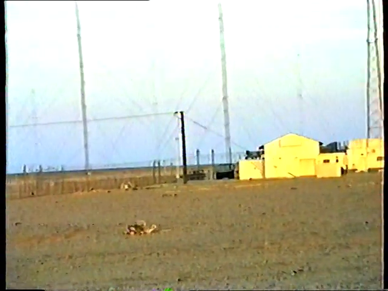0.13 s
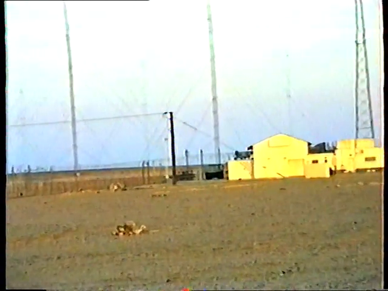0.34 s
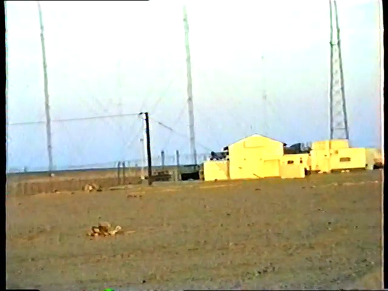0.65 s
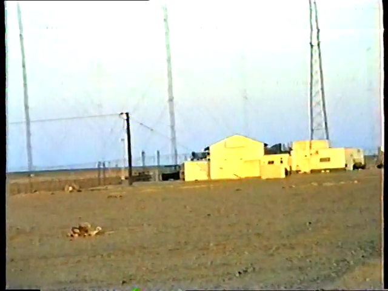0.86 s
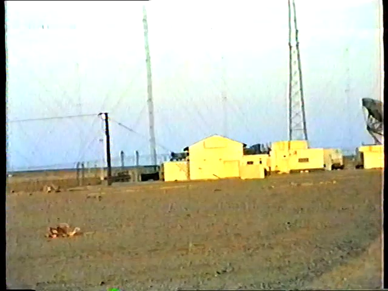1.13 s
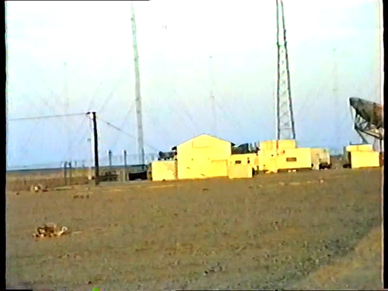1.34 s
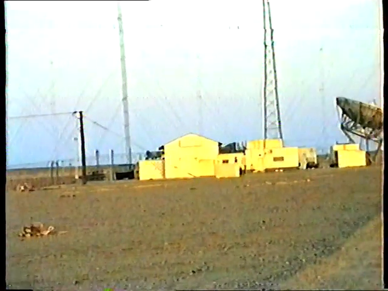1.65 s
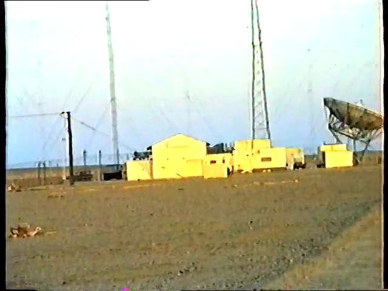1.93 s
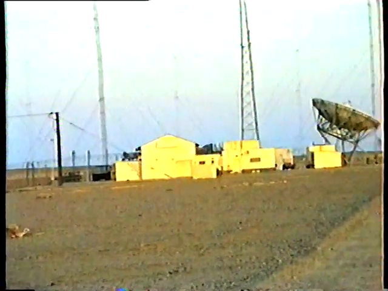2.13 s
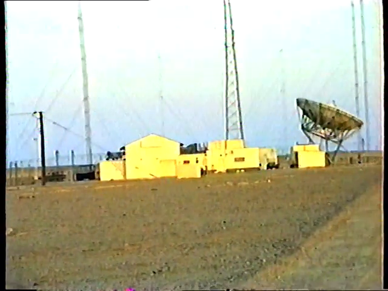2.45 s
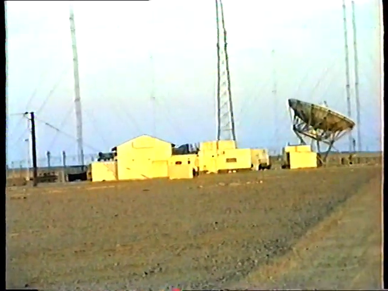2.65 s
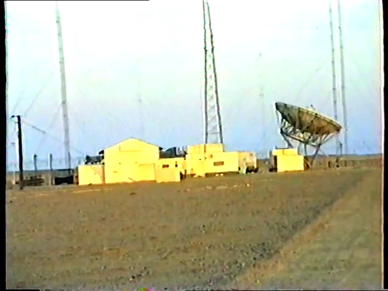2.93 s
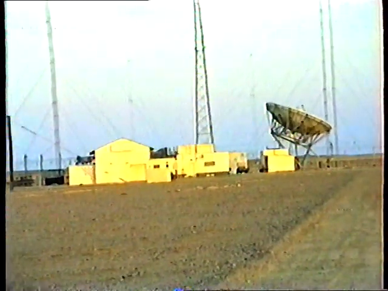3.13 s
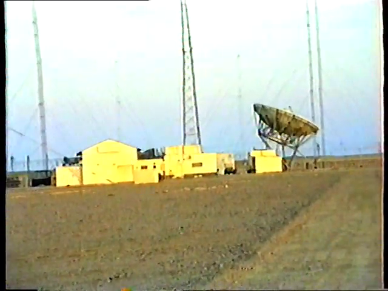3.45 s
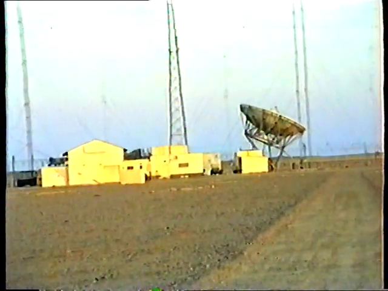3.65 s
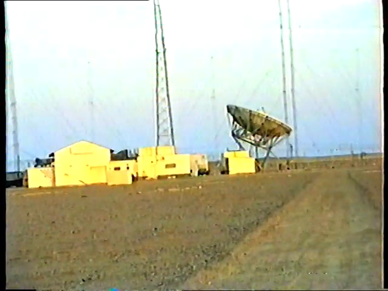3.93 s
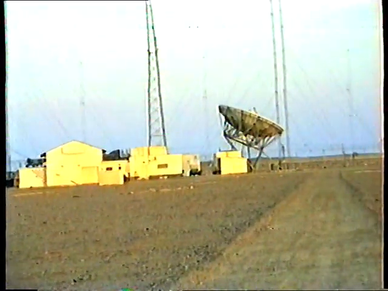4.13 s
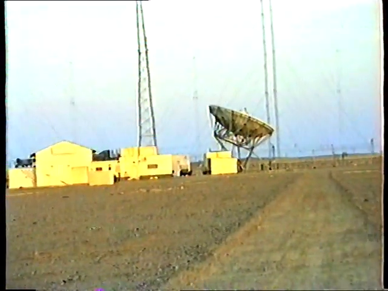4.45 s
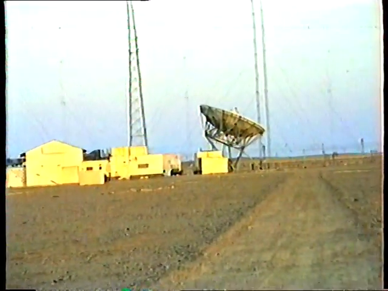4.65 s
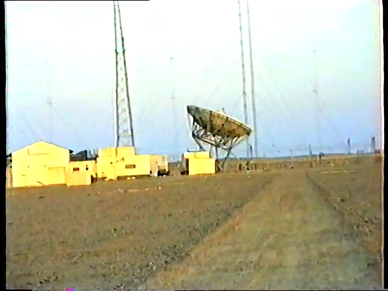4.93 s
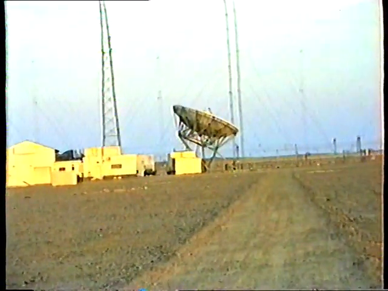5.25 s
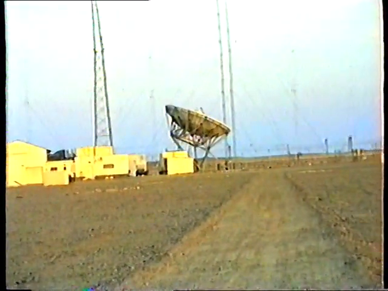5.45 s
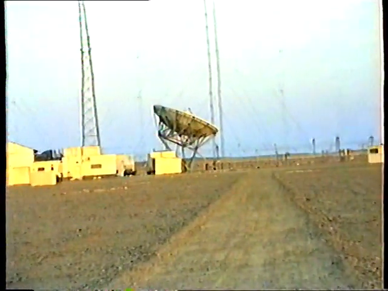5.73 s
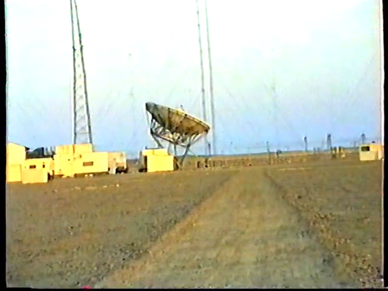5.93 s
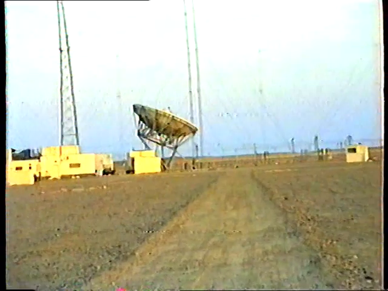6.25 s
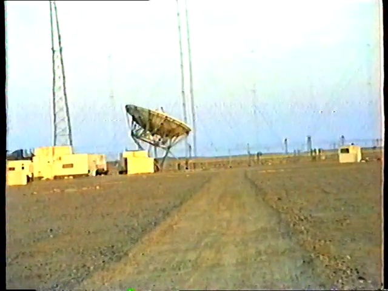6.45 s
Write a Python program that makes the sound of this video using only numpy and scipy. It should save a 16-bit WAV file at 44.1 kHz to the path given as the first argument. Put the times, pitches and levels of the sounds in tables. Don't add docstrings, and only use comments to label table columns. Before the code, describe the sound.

Throughout about 6.6 seconds, gusty desert wind presses on a tape camcorder's two microphones, making a dry, low, uneven rumble mostly below a few hundred hertz. Left and right flutter independently, giving a wide, unstable image. From 0 to 1.5 s it thumps in irregular puffs; around 1.8 to 3 s it is fuller and rougher, with a push near 3.0. It eases from about 3.3 to 4 s, then heavy blows arrive near 4.2, 4.5 and 4.9. After a short dip it surges again from 5.6 to the abrupt end, leaning right. Quietly underneath are a constant motor whirr, a fast 150-per-second drum buzz and soft tape hiss. Sparse dull ticks occur, including a small group near 1.9 to 2.1 s. At 3.6 s several light knocks touch the housing; a soft rub and tiny electrical zip follow at 3.8 s.

```python
import sys
import numpy as np
from scipy import signal
from scipy.fft import rfft, irfft, next_fast_len
from scipy.io import wavfile
from scipy.ndimage import uniform_filter1d

SR = 44100
rng = np.random.default_rng(int(sys.argv[2]) if len(sys.argv) > 2 else 0)


def invert_db(level):
    return 10 ** (np.asarray(level, dtype=float) / 20)


def output_pcm(signal):
    pcm = np.clip(np.atleast_2d(signal).T, -1, 1) * 32767
    wavfile.write(sys.argv[1], SR, np.round(pcm).astype(np.int16))


N = 290881
T = np.arange(N) / SR


def level(x, db):
    return x * invert_db(db) / np.sqrt(np.mean(x ** 2))


def lowpass(x, order, hz):
    return signal.sosfilt(signal.butter(order, hz, fs=SR, output="sos"), x)


def coloured(table, centre_hz=None):
    size = next_fast_len(N)
    hz, db = np.transpose(table)
    octave = np.log2(np.arange(1, size // 2 + 2) * SR / size)
    gain = invert_db(np.interp(octave, np.log2(hz), db, left=-200, right=-200))
    if centre_hz:
        gain = gain * np.cos(np.pi / 2 * np.clip(2 * (octave - np.log2(centre_hz)), -1, 1))
    return irfft(rfft(rng.standard_normal(size)) * gain, size)[:N]


def ring(x, hz, width_hz):
    return signal.lfilter(*signal.iirpeak(hz, hz / width_hz, SR), x)


def walk(rate):
    hold = int(SR / rate)
    steps = np.repeat(rng.standard_normal(N // hold + 1), hold)
    return 0.9 * uniform_filter1d(uniform_filter1d(steps, hold), hold)[:N]


def steady(x, span_s):
    span = int(span_s * SR)
    power = uniform_filter1d(uniform_filter1d(x ** 2, span), span)
    return x / np.sqrt(power / np.mean(x ** 2))


def bell(s, width_s):
    return np.exp(-((T - s) / width_s) ** 2 / 2)


def bumps(rows, column, width_s):
    rows, coarse = np.array(rows), T[::64]
    bells = np.exp(-((coarse - rows[:, :1]) / width_s) ** 2 / 2)
    return np.interp(T, coarse, rows[:, column] @ bells)


def mechanism():
    # (frequency [Hz], density [dB per Hz])
    whirr_spectrum = [(530, -30.5), (900, -8.5), (1300, -8.5), (1480, -6), (1830, -10), (2550, -11),
                      (2750, -13), (3300, -19.5), (3900, -20.5), (5150, -23.5), (5450, -26.5), (11300, -32),
                      (11420, -53.5), (12000, -57.5)]
    # (frequency [Hz], density [dB per Hz])
    hiss_spectrum = [(530, -31.5), (900, -9.5), (1300, -15.5), (1900, -12.5), (3200, -21.5), (4700, -27),
                     (7000, -30.5), (11300, -35), (11420, -54), (12000, -59.5)]
    # (time [s], lift [dB], half width [s])
    labouring = [
        (.45, -0.5, 0.57),
        (1.999, 0.5, 0.14),
        (2.7, 0.7, 0.24),
        (3.95, 0.5, 0.16),
        (5.7, -0.5, 0.27),
        (6.499, 0.5, 0.21),
    ]
    # (time [s], lift [dB], half width [s], centre [Hz])
    drifting = [
        (.55, 2.5, .2, 1250),
        (.3, 0.5, 0.18, 2200),
        (1.2, 1, 0.18, 1250),
        (2.949, 1.5, 0.22, 1500),
        (3.5, -1, 0.17, 1200),
        (3.9, 1.5, 0.2, 2100),
        (4.85, 0, .1, 1200),
        (5.55, 2.5, 0.16, 1900),
        (5.9, 2.5, .15, 1250),
    ]
    swell_db = -65.5 + sum(lift_db * bell(s, width_s) for s, lift_db, width_s in labouring)
    flicker_db = 0.77 * walk(rate=44) + 0.62 * walk(rate=6.4)
    whirr = level(coloured(whirr_spectrum), 0) * invert_db(swell_db + flicker_db)
    for s, lift_db, width_s, hz in drifting:
        whirr = whirr + (invert_db(2 * lift_db) - 1) * bell(s, width_s) * ring(whirr, hz, 0.4 * hz)
    hiss = np.array([level(coloured(hiss_spectrum), -70) for _ in range(2)])
    whine = invert_db(-100.5) * np.sin(2 * np.pi * 7999.7 * T)
    return whirr * invert_db([[0.8], [-0.8]]) + hiss + whine


def drum():
    # (centre [Hz], width [Hz], left [dB], right [dB], weakness of every other tap [0-1])
    body = [(1840, 480, -71, -76, 0.3), (2266, 260, -76.5, -84.5, 0.5), (2568, 59, -84, -85.5, 0.5),
            (3520, 900, -90.5, -90, 0.3), (4500, 200, -84.5, -88.5, 0.06), (4960, 250, -87.5, -86, 0),
            (6560, 600, -94.5, -97.5, .3), (8300, 700, -97.5, -103, .3), (9600, 800, -98.5, -92.5, .2)]
    drum_hz = 150
    at = np.arange(280, N, SR // drum_hz)
    strength = invert_db(0.66 * rng.standard_normal(len(at)))
    every_other = np.arange(len(at)) % 2
    out = 0
    for hz, width_hz, left_db, right_db, uneven in body:
        taps = np.zeros(N)
        taps[at] = strength * (1 - uneven * every_other)
        rung = ring(ring(taps, hz, width_hz), hz, width_hz)
        out = out + level(rung, 0) * invert_db([[left_db], [right_db]])
    return np.array([out[0], np.roll(out[1], 1)])


def ticks():
    # (time [s], left [dB], right [dB])
    handovers = [(.179, -70, -56), (1.152, -54, -70), (1.278, -70, -54), (1.86, -70, -54), (1.88, -70, -55),
                 (1.9, -70, -50), (2.0763, -46, -70), (2.0785, -70, -44), (2.0985, -70, -49),
                 (3.208, -54, -51), (3.587, -60, -55), (4.66, -53, -70), (4.681, -70, -51),
                 (5.419, -70, -51), (5.643, -70, -53), (6.347, -70, -46)]
    s, *db = np.transpose(handovers)
    out = np.zeros((2, N))
    out[:, (s * SR).astype(int)] = invert_db(np.array(db) + 16)
    return lowpass(out, 2, 2400)


def handling():
    # (time [s], level [dB], centre [Hz], t60 [s], left minus right [dB])
    knocks = [
        (2.073, -51.5, 3580, .05, -1),
        (3.5853, -48, 4220, .03, 1),
        (3.5893, -46, 2850, 0.042, 2),
        (3.598, -41, 2070, .05, 8),
        (3.611, -43, 2300, .05, -1),
        (3.779, -48, 2100, .12, 0),
    ]
    zip_start_s, zip_hz, zip_clicks = 3.8105, 260, 25
    out = np.zeros((2, N))
    for s, db, hz, t60, pan_db in knocks:
        fade = (T >= s) * np.exp(-np.log(1000) * np.abs(T - s) / t60)
        knock = ring(ring(rng.standard_normal(N) * fade, hz, 0.45 * hz), hz, 0.45 * hz)
        out += knock * invert_db(db + np.array([[pan_db], [-pan_db]]) / 2)
    clicks = np.zeros(N)
    at = (SR * (zip_start_s + np.arange(zip_clicks) / zip_hz)).astype(int)
    clicks[at] = invert_db(-46.5) * np.hanning(zip_clicks + 2)[1:-1] ** 0.6
    return lowpass(out, 4, 5700) + ring(clicks, 7000, 8000)


def port_wind(sharp_db, blows, shed):
    # (frequency [Hz], density [dB per Hz])
    eddy_spectrum = [(7.1, -48.5), (12, -20.5), (64, -1), (135, -1), (323, -11.5), (635, -26.5),
                     (1190, -46.5), (2200, -65), (2860, -86), (4840, -120)]
    blow_s, even_s = 0.008, 0.029
    buffet_db = 2.5 * walk(rate=32)
    sizes = 16 * 2 ** (np.arange(15) / 2)
    eddies = []
    for hz in sizes:
        eddy = coloured(eddy_spectrum, hz) * invert_db(0.48 * walk(rate=25))
        eddies.append(steady(eddy, 0.2 + 8 / hz))
    eddies = np.array(eddies)
    eddies = eddies + shed * ring(eddies, 133, 110)
    lift_db = 1.12 * bumps(blows, column=1, width_s=blow_s)
    tilt_db = 0.9 * bumps(blows, column=2, width_s=1.9 * blow_s)
    groups = ((sizes < 200, -0.3, 1),
              ((sizes > 200) & (sizes < 450), 0.7, 1),
              (sizes > 450, 0.7, 0.79))
    out = 0
    for group, share, feel in groups:
        whole = eddies[group].sum(axis=0)
        small = np.clip(np.log2(sizes[group] / 200), 0, 1)[:, None]
        shaped = eddies[group] * invert_db((1 - 0.62 * small) * buffet_db + 0.82 * small * sharp_db)
        evening = steady(whole, even_s) / whole
        out = out + shaped.sum(axis=0) * evening * invert_db(feel * (lift_db + share * tilt_db))
    return level(out, 0)


def wind():
    # (time [s], level [dB], sharpness as 300-900 Hz share [dB], left minus right [dB])
    gust = [(0.0, -29.5, -14, 3), (0.601, -27.5, -11.5, 0.5), (1.1, -27.0, -11.5, 2.5),
            (1.8, -25, -8.5, 1.5), (2.3, -25, -13, -2.5), (2.8, -24.5, -14, -3), (3.3, -28.5, -10.5, 3),
            (3.6, -28, -14, -0.5), (4.2, -30, -13.5, -4), (4.42, -28.5, -13, 1.5), (4.551, -24, -20, -4),
            (4.72, -28.5, -14.5, 4.5), (5.25, -30, -12, -3.5), (5.6, -24.5, -10, -4), (6.1, -26, -13, -6.5),
            (6.6, -25, -16.5, -5.5)]
    # (time [s], lift [dB], extra sharpness [dB])
    puffs = [(.28, 2, -1.5), (0.479, -1.5, 2.4), (.77, 2.5, -2), (0.979, 1, 1), (1.18, 3.5, -3),
             (1.39, -1, -0.7), (1.59, -4, -2), (1.84, -1.5, 0.5), (2.11, -0.4, 3), (2.6, 2.5, 4.5),
             (3.04, 6, -3), (3.159, 2.5, 1.1), (3.26, -1, 2), (3.99, 0.5, -0.5), (4.18, 7, -4),
             (4.501, 8, -3.5), (4.56, 0.5, 2.5), (4.63, 0, 5), (4.809, 0.5, 6), (4.931, 5.5, -2.5),
             (5.09, 1.5, -2), (5.401, 4, -3.5), (5.63, 7, -4), (5.83, 8, -1.5), (5.99, 4, 0.9),
             (6.119, 5, 0), (6.27, 4, 1), (6.53, 3.5, 0.5)]
    # (time [s], share passed over [ratio], half width [s])
    heading = [
        (1.9, -0.044, 1),
        (4.6, 0.051, 0.07),
        (6.1, -0.024, 0.37),
    ]
    # (time [s], lift [dB], small eddies against large [dB])
    blows_left = [(0.008, 7, -2), (0.135, 1.5, -0.5), (0.175, -6.5, 0), (0.292, 5.5, -4),
                  (0.399, -0.5, 0.5), (0.48, 9.5, -5.5), (0.604, -5, -2), (0.656, -5, 5), (0.764, 5.5, 2),
                  (0.801, 0.5, -7), (0.909, -8.5, 6.5), (0.98, 2, -1), (1.147, 7, -3), (1.216, 2.5, -1),
                  (1.463, 4, -9), (1.594, 11, -4), (1.836, 7, -10.5), (2.006, 1.5, -3), (2.253, 5, -1.5),
                  (2.292, -3.5, 2), (2.41, 2, 2.5), (2.469, -10, 10.5), (2.604, 3, 3.5), (2.787, 4, -6.5),
                  (2.844, 8, -8), (2.913, 1, 1), (2.96, -6.5, -1), (3.049, 1.5, -3.5), (3.21, -6, 1.5),
                  (3.264, 8, -3), (3.329, -5, -0.5), (3.391, 2, 0), (3.51, -0.5, 6), (3.684, 5, -9.5),
                  (3.786, 3.5, 8.5), (3.878, 8, -0.5), (3.993, 4.5, -3.5), (4.194, 5, -1.5),
                  (4.274, -10, 4.5), (4.324, 1, -0.5), (4.593, 4, -2.5), (4.633, 2.5, -1),
                  (4.685, -9.5, -6), (4.753, -7.5, 1.5), (4.79, 3.5, -2), (4.951, 6, 0.5),
                  (5.007, -10.5, 3.5), (5.094, 6, -1.5), (5.294, -9.5, 4), (5.377, -5.5, 3),
                  (5.575, -3, -0.5), (5.619, 1, -3), (5.844, 4, -3.5), (5.964, 6, -7), (6.055, -6.5, 5.5),
                  (6.124, 4, 0.5), (6.167, -7.5, 1.5), (6.26, 4.5, -5), (6.389, 9, -1.5),
                  (6.522, 2.5, -2.5)]
    # (time [s], lift [dB], small eddies against large [dB])
    blows_right = [(0.048, 5, 1.5), (0.117, -1.5, 1), (0.206, 6, -8.5), (0.337, 1.5, 4.5), (0.48, 1, 1.5),
                   (0.562, 2, -8), (0.699, 2.5, 1.5), (0.959, -4, 3.5), (1.032, 2.5, -2.5),
                   (1.186, -0.5, 3.5), (1.473, 2.5, -5), (1.624, 5.5, -2.5), (1.667, 0.5, -2),
                   (1.849, 1.5, -2.5), (2.004, -4, -4.5), (2.072, -5.5, 5.5), (2.123, 5, -5),
                   (2.242, 1.5, -7.5), (2.287, 6, 3.5), (2.456, 1, -6.5), (2.691, -7.5, 7.5),
                   (2.728, -1.5, -3), (2.822, -9, -1), (2.877, -2.5, 13), (3.027, -3, 4), (3.078, -5, 2.5),
                   (3.17, 1.5, 2), (3.363, 2, -4), (3.464, -3.5, 3.5), (3.508, -0.5, -7.5),
                   (3.556, -11, 6.5), (3.608, 1, -6.5), (3.75, -5.5, 4), (3.793, 3.5, 2.5), (3.873, -2, 1),
                   (3.925, 8.5, -1.5), (3.992, 7.5, -4), (4.13, -2.5, 1.5), (4.179, 2.5, -3.5),
                   (4.255, -3, 10), (4.301, 7.5, -5), (4.419, -1, 5), (4.49, 6.5, -3), (4.597, 3, -1),
                   (4.804, 7, 0), (4.933, 7.5, 5.5), (5.235, -7, 5), (5.28, 7, -2.5), (5.371, -10.5, 0.5),
                   (5.506, 3.5, -4), (5.669, -1, 0.5), (5.71, 1.5, -3), (5.751, -5.5, 3), (5.941, -7.5, 10),
                   (5.992, 5, -3), (6.165, -6, 6.5), (6.205, -3, -8.5), (6.332, 7, 3), (6.469, -1.5, -0.5),
                   (6.536, 2, 0.5)]
    puff_s = 0.057
    s, *columns = np.transpose(gust)
    gust_db, sharp_db, pan_db = (np.interp(T, s, c) for c in columns)
    gust_db = gust_db + 0.72 * bumps(puffs, column=1, width_s=puff_s)
    sharp_db = sharp_db + bumps(puffs, column=2, width_s=puff_s)
    sharp_db = sharp_db - sharp_db.mean()
    left = port_wind(sharp_db - 0.6, blows_left, shed=0.24) * invert_db(1.5)
    right = port_wind(sharp_db + 0.29, blows_right, shed=0.033) * invert_db(-0.19)
    ports = np.array([left, right])
    shared = sum(share * bell(at_s, width_s) for at_s, share, width_s in heading)
    ports = (ports + shared * ports[::-1]) / np.sqrt(1 + shared ** 2)
    rolled = lowpass(ports[::-1], 2, 150)
    ports = ports + 0.35 * rolled * np.array([[1], [-1]])
    return ports * invert_db(gust_db - 0.36 + 0.9 * np.array([pan_db, -pan_db]) / 2)


def lift_slices(x, rows):
    slice_s, slice_octaves = 0.06, 0.24
    size, rows = next_fast_len(N), np.array(rows, float)
    spectrum = rfft(x, size)
    f = np.log2(np.arange(1, size // 2 + 2) * SR / size)
    for octave in np.log2(32) + np.arange(15) / 3:
        near = np.exp(-((np.log2(rows[:, 1]) - octave) / slice_octaves) ** 2 / 2)
        lifts = np.c_[rows[:, 0], rows[:, 2] * near]
        lift_db = 0.81 * bumps(lifts, column=1, width_s=slice_s)
        window = np.cos(np.pi / 2 * np.clip(3 * (f - octave), -1, 1)) ** 2
        x = x + (invert_db(lift_db) - 1) * irfft(spectrum * window, size)[:N]
    return x


def shifting_wind():
    # (time [s], pitch [Hz], lift [dB])
    centre_lifts = [(0.07, 152, -9), (0.37, 54, -9), (0.44, 75.4, 17), (0.66, 152, -10.5),
                    (0.84, 110, -8.0), (0.85, 91, 11.5), (0.99, 75.2, 10.5), (1.06, 150, -7.5),
                    (1.08, 181, 4), (1.1, 181, 6.0), (1.12, 64, -12), (1.22, 180, -6.5), (1.4, 64, 9.5),
                    (1.62, 252, 4), (1.66, 64.7, -8), (1.86, 127, 5.0), (1.9, 76.6, 11), (2.21, 179, -8),
                    (2.35, 76, -10.5), (2.37, 90.4, 9.5), (2.4, 90, 7.0), (2.43, 130, -8), (2.55, 180, 4),
                    (2.85, 129, -1.5), (3.04, 127, 4.5), (3.06, 183, -6), (3.12, 248, 7.5), (3.14, 110, -9),
                    (3.28, 90, 8.5), (3.39, 134, -5), (3.8, 210, 8), (4.15, 110, -9), (4.5, 181, 0.5),
                    (4.51, 89.5, -7.5), (4.54, 130.5, 6), (4.56, 53.6, 9.5), (4.64, 64, -13),
                    (4.66, 213, 9.5), (4.781, 54, -10), (4.79, 76, 12), (4.86, 90, -7), (4.9, 109.5, 12.5),
                    (4.93, 131, -6), (4.97, 181, 3.5), (5.15, 210, 9), (5.151, 250, -11.5),
                    (5.28, 125, 4.5), (5.4, 208, 8.5), (5.64, 45.6, -10.5), (5.7, 242, -9), (5.719, 110, 4),
                    (5.85, 130, 3.5), (5.91, 90, -11.0), (5.93, 249, 8.5), (5.95, 251, 0.5),
                    (5.97, 217, -5.5), (6.06, 54, -11), (6.27, 150.4, 6.5), (6.34, 45, -9),
                    (6.59, 150.7, -6),
                    (0.21, 160, 6.0), (0.23, 220, -5), (0.39, 220, 6.0), (0.43, 262, -4.5),
                    (0.46, 370, 3.5), (0.47, 623, -4), (0.51, 109, 6.5), (0.58, 130, -7.5),
                    (0.96, 131, 5.0), (0.97, 181, -3.5), (1.1, 179, 4.0), (1.23, 178, -6), (1.33, 183, 6),
                    (1.46, 180, -5.0), (1.63, 260, 3), (1.72, 440, 4.5), (1.74, 261, -4.0),
                    (1.74, 261, -4.0), (1.75, 222, 6.5), (1.75, 523, -6.5), (1.78, 438, 6), (1.88, 520, -8),
                    (1.99, 182, -7.5), (2.0, 220, 4.5), (2.01, 220, 7), (2.11, 259, -4.5), (2.3, 370, -7),
                    (3.05, 109, 5.0), (3.05, 180, -3.5), (3.12, 257, 3), (3.27, 262, -5.0),
                    (3.36, 260, 4.5), (3.76, 513, 4), (3.8, 308, -2.5), (4.16, 222, -2), (4.32, 258, 4),
                    (4.46, 160, -2), (4.5, 263, -3.5), (4.51, 309, 0), (4.95, 130, -4), (4.98, 160, 7.5),
                    (5.29, 110, 3.5), (5.38, 520, -6.5), (5.4, 438, 5.5), (5.61, 259, 4.0),
                    (5.9, 368, -4.5), (5.94, 260, 3.5), (5.97, 179.5, -2.5), (6.01, 132, 5.0),
                    (6.08, 260, -3), (6.09, 259, -3.5), (6.11, 375, 4.5), (6.12, 220, 6.5),
                    (6.13, 130, -4.5), (6.13, 520, -5.5), (6.32, 260, 4.0), (6.43, 180, -4.0),
                    (6.52, 257, 3)]
    # (time [s], pitch [Hz], lift [dB])
    side_lifts = [(0.0, 130, -13), (0.35, 150, 0), (0.35, 150, -1.5), (0.35, 180, 5), (0.98, 110, 8),
                  (0.98, 110, 9.0), (0.99, 90, -10), (1.21, 130, 4.5), (1.33, 54, -8.5),
                  (1.63, 110, 10.5), (1.84, 54, -10), (1.84, 76, 10), (1.98, 150, 6.5), (2.05, 110, -9),
                  (2.05, 130, 4), (2.08, 54, -9), (2.1, 76, 9.5), (2.42, 54, 15.5), (2.42, 64, -8.5),
                  (2.42, 90, 13), (2.47, 130, -10), (2.53, 76, 6.0), (2.61, 110, 6.5), (2.71, 180, 8.5),
                  (2.83, 150, -6.0), (2.87, 76, 8), (2.92, 45, 14.5), (3.04, 64, -8), (3.05, 130, 9),
                  (3.13, 76, -7.0), (3.14, 110, -5.5), (3.15, 64, 9.0), (3.18, 90, 11), (3.5, 110, 7.5),
                  (3.67, 180, -8), (4.02, 130, 2), (4.15, 54, 10), (4.17, 130, -8), (4.23, 64, -9.0),
                  (4.33, 210, 9), (4.49, 150, -6.0), (4.51, 90, -10.5), (4.6, 110, 7),
                  (4.61, 54, -13.0), (4.63, 250, 8.5), (4.78, 110, -5), (4.8, 150, 11.5),
                  (4.94, 54, 10), (5.62, 180, 3.5), (5.65, 150, -9), (5.68, 90, 6), (5.77, 210, -5.5),
                  (5.87, 76, -5.5), (5.98, 130, 5), (6.02, 150, -4.5), (6.07, 90, -9.5),
                  (6.28, 64, -10.0), (6.44, 90, -6.5), (6.49, 110, 2), (6.59, 90, 1)]
    left, right = wind()
    alike = lift_slices((left + right) / 2, centre_lifts)
    opposed = lift_slices((left - right) / 2, side_lifts)
    return np.array([alike + opposed, alike - opposed])


def scene():
    return shifting_wind() + drum() + mechanism() + handling()


def top_cut(x):
    return signal.sosfilt(signal.butter(12, 11960, fs=SR, output="sos"), x)


def record(dry):
    widen_lag = 592
    leak_hz, ceiling = 3899.95, 0.3
    mid, side = (dry[0] + dry[1]) / 2, (dry[0] - dry[1]) / 2
    late = np.concatenate([np.zeros(widen_lag), mid[:-widen_lag]])
    late = signal.sosfilt(signal.butter(2, 78, "high", fs=SR, output="sos"), late)
    late = lowpass(late, 1, 1300)
    deep = lowpass(mid, 1, 90)
    mid = invert_db(-1.5) * (mid - 0.61 * late - 0.57 * deep)
    mid = mid - invert_db(-31.5) * bell(6.5965, 0.0018)
    wide = np.array([mid + side, mid - side]) + ticks()
    wide = wide * np.clip(T / 0.002, 0, 1)
    wide = wide / (1 + (wide / ceiling) ** 4) ** 0.25
    leak = invert_db(-49.0) * np.cos(2 * np.pi * leak_hz * T)
    leak = leak + invert_db(-67.0) * np.cos(4 * np.pi * leak_hz * T)
    return top_cut(wide * (1 + leak))


dry = scene()
out = record(dry)
output_pcm(out)
```